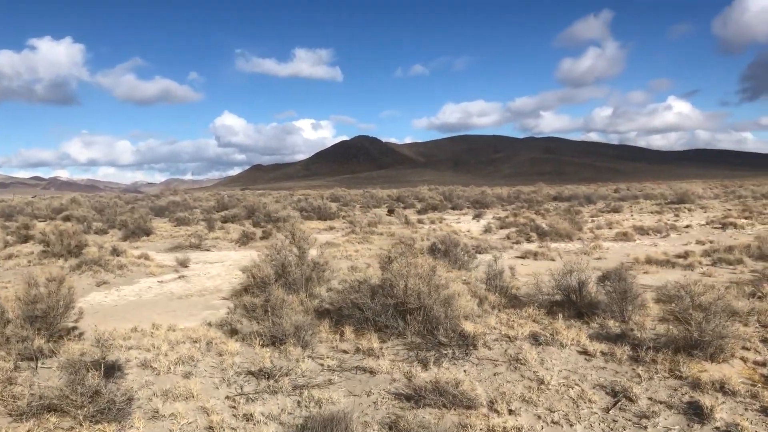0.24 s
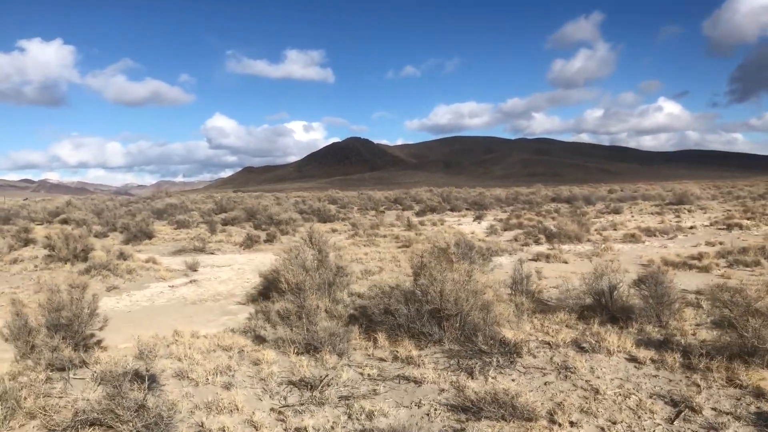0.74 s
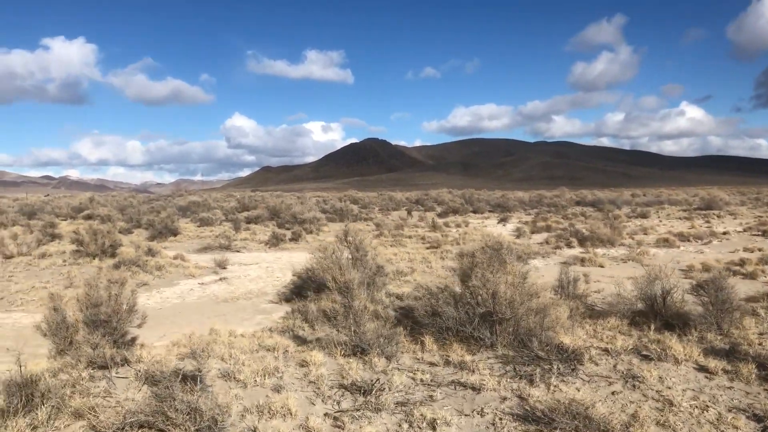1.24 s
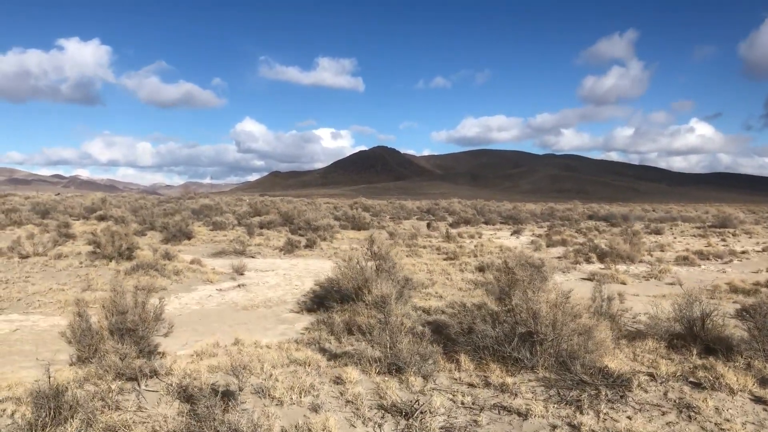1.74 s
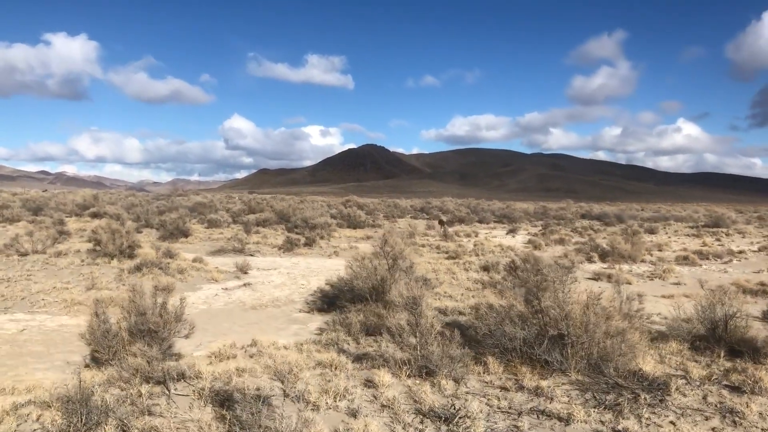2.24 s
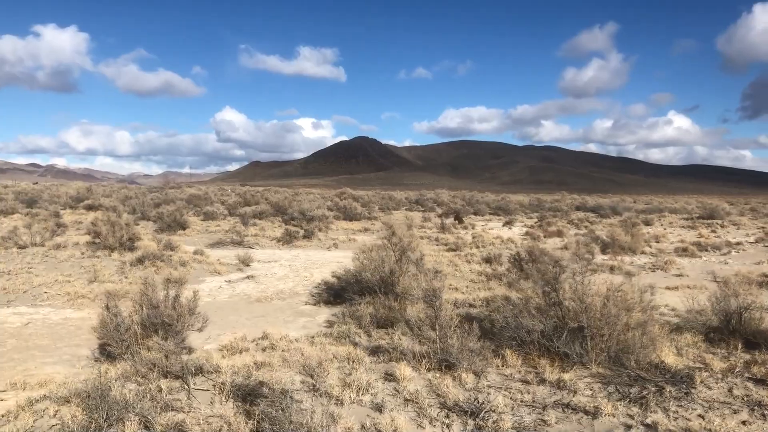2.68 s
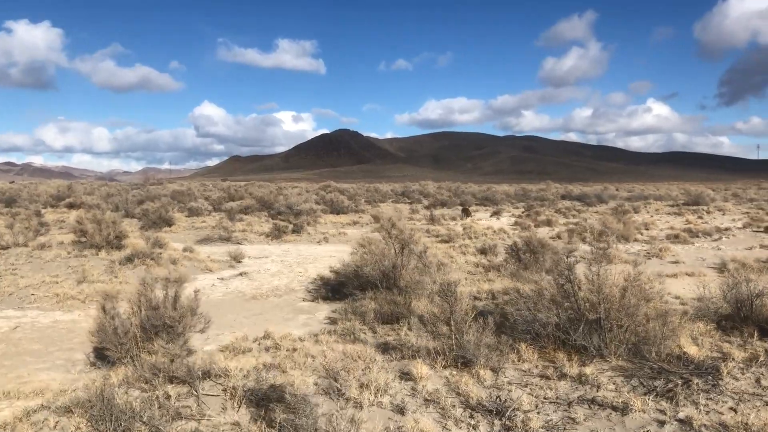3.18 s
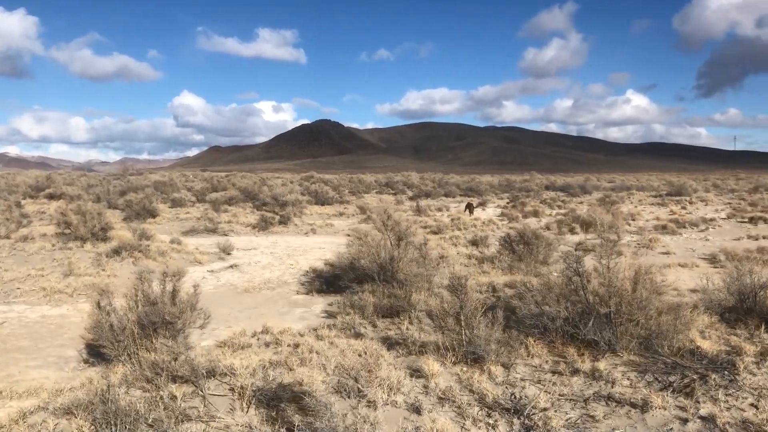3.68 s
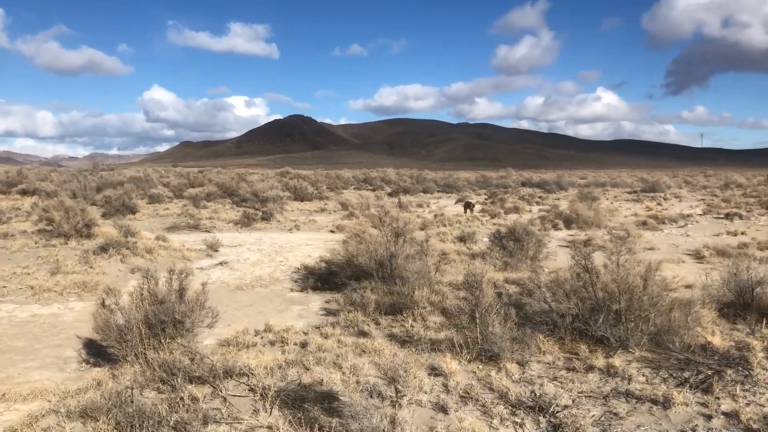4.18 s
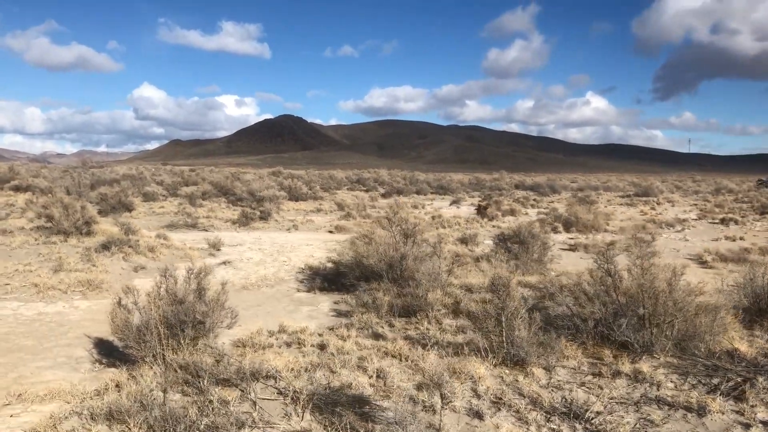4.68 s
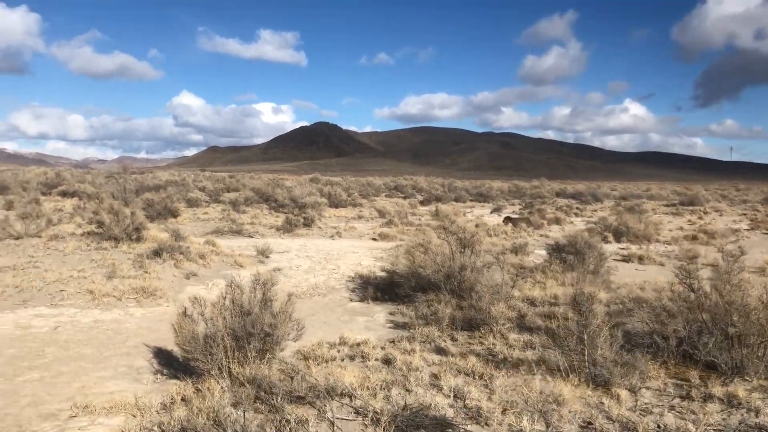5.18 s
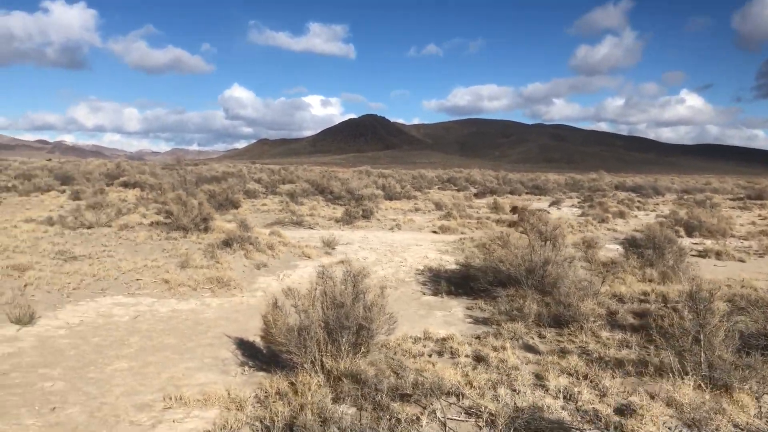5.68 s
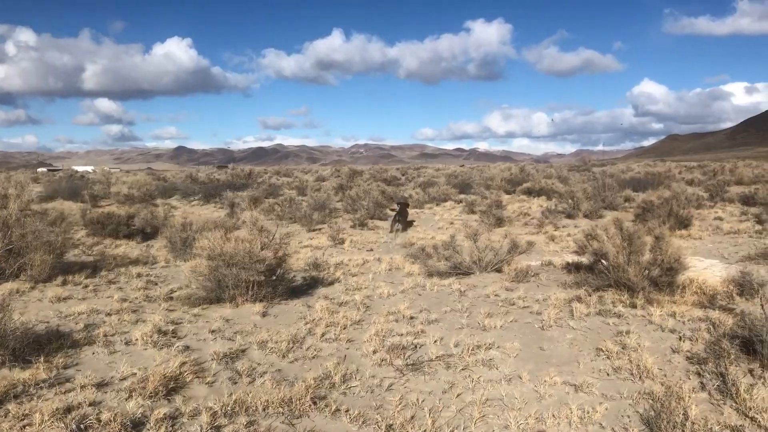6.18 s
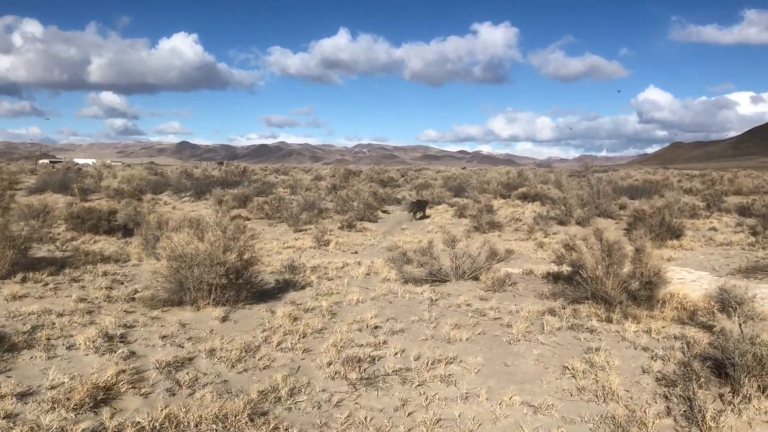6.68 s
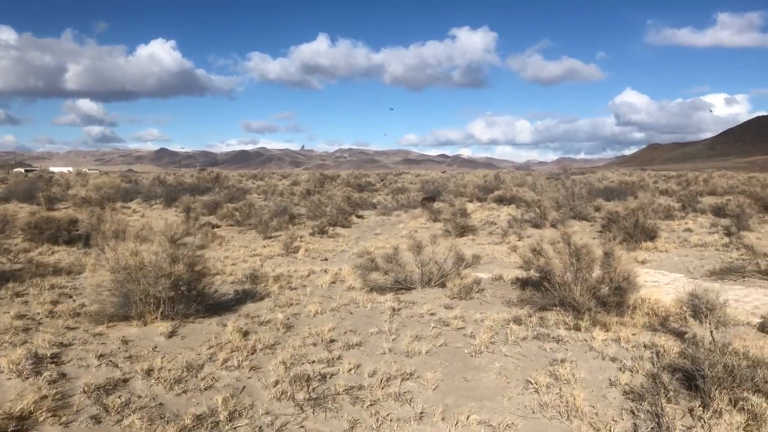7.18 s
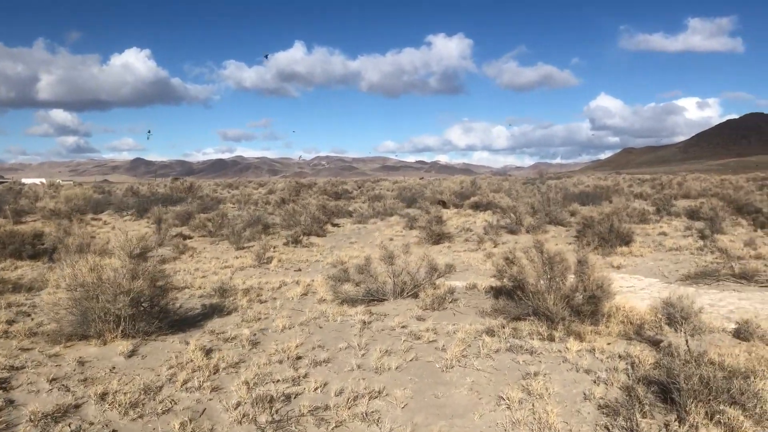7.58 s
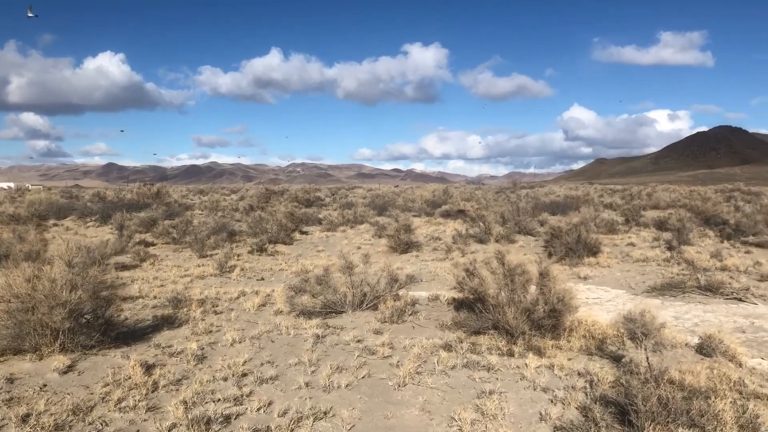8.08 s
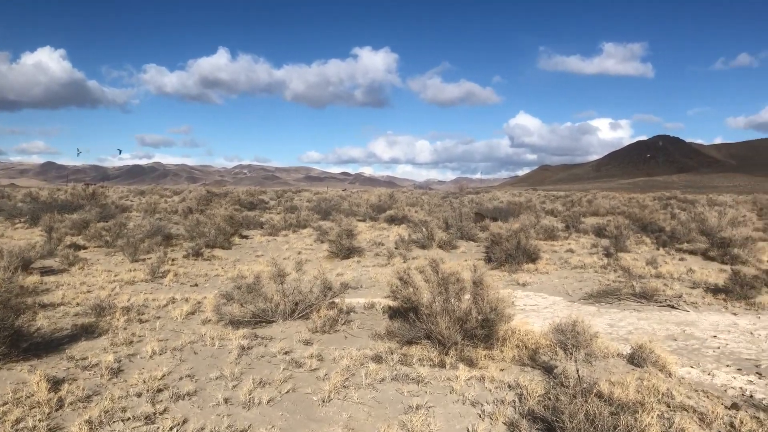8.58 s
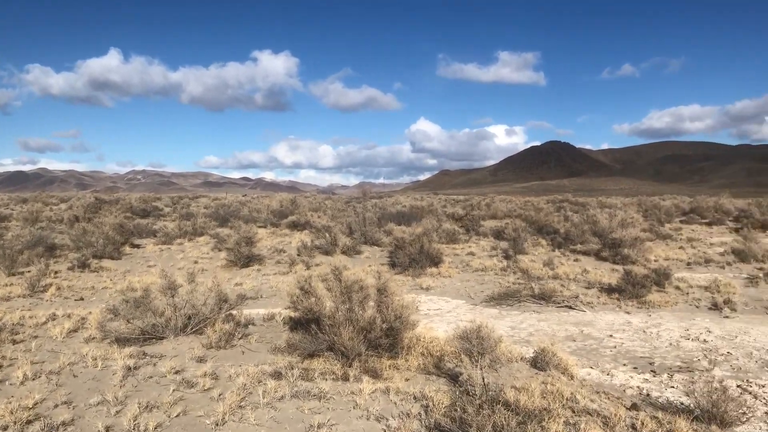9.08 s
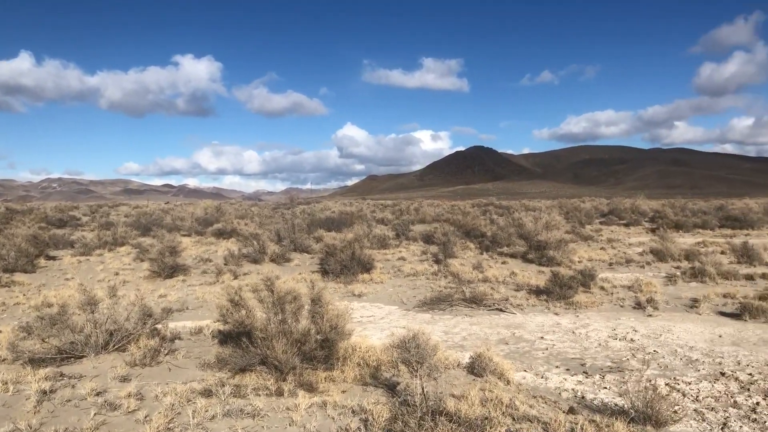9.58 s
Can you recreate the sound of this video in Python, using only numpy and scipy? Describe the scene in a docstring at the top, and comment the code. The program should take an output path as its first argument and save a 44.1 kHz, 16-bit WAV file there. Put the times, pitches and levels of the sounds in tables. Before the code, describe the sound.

On an open scrubby desert flat, gusty wind batters a hand-held phone microphone with low rumble, flutter and blunt thuds, easing around three seconds and surging near five. A click and hard cut drop it to a much quieter stretch: dry brush rustling and snapping, faint sandy scuffs and small knocks of soles, soft low wind thumps, and thin high chirps from a small bird some way off.

```python
"""Gusty wind buffets the microphone port of a hand-held phone, then, after a hard cut, a calmer stretch.
Wind is filtered rumble plus random pressure ripples, with single eddies in the gusts and thumps in the calm.
Dry brush rustles as grainy shaped noise; its snaps and a click at the cut are short noise bursts.
In the calm, noise scuffs and knocks are soles on the ground, and a small bird some way off sings in
gliding sines, over a faint bed of air noise. Table levels are relative: fixed trims follow."""
import sys
import numpy as np
from scipy import signal
from scipy.fft import rfft, irfft
from scipy.io import wavfile
from scipy.ndimage import uniform_filter1d

SR = 44100
rng = np.random.default_rng(int(sys.argv[2]) if len(sys.argv) > 2 else 0)


def inscribe(sig):
    """Save sig as 16-bit PCM at rate SR to the path in sys.argv[1].

    A 1-D sig is mono; a 2-D sig holds one channel per row.
    Samples are clipped to [-1, 1] before scaling.
    """
    pcm = np.round(np.clip(np.atleast_2d(sig).T, -1, 1) * 32767)
    wavfile.write(sys.argv[1], SR, pcm.astype(np.int16))


N = 433944
T = np.arange(N) / SR
CUT_S = 5.8765
GUSTY = T < CUT_S


def wind():
    """Turbulence at the port: rumble and flutter throughout, eddies in the gusts, thumps in the calm."""
    rumble_db, flutter_db, deep_db = wind_levels()
    puff = np.clip(.95 * walk(90) + .35 * walk(25), -3, 1.6)
    gust_flutter = flutter(np.where(GUSTY, flutter_db, -60) + 36, puff)
    calm_flutter = flutter(np.where(GUSTY, -60, flutter_db) + 33, puff)
    blow = undb(rumble_db - 1.32) * rumble(deep_db, puff)
    blow += undb(flutter_db - 5) * np.where(GUSTY, gust_flutter, calm_flutter)
    cut_fade = np.clip(np.abs(T - CUT_S) / 0.00014, 0, 1)
    return cut_fade * (blow + GUSTY * eddies()) + thumps()


# Wind between buffets, before and after the cut. Each row: time in seconds, rumble level in dB,
# flutter level in dB, deepest rumble over whole rumble in dB.
GUST_LEVELS = [(0.0, -33.5, -42.5, -4.5), (0.23, -32.5, -41, -4.5), (0.73, -30.5, -46.5, -4),
               (0.98, -37, -49.5, -3), (1.16, -26, -38, -3.5), (1.34, -25, -37, -4), (1.55, -29, -43, -4),
               (1.73, -32, -47, -4), (1.98, -30.5, -42, -4.5), (2.32, -31.5, -41.5, -4),
               (2.74, -40, -60, -5.5), (2.94, -40, -60, -4), (3.14, -37.5, -58, -6.5),
               (3.3, -41.5, -75, -4), (3.55, -40.5, -58.5, -3), (3.73, -33.5, -49.5, -4),
               (4.27, -30, -49.5, -3), (4.56, -35, -64, -3.5), (4.72, -35, -60.5, -4.5),
               (5.0, -31, -36, -4.5), (5.21, -22.5, -33.5, -3.5), (5.52, -27, -38, -4),
               (5.72, -26.5, -30.5, -3.5), (5.87, -43.5, -61, -5)]
CALM_LEVELS = [(5.9, -52, -69, -5), (6.09, -54.5, -63, -3.5), (6.32, -50.5, -67, -4), (6.52, -58, -78, -3),
               (6.97, -57, -74, -2), (7.38, -56.5, -69, -3.5), (7.61, -55, -75, -2.5), (7.76, -56, -77, -3),
               (8.34, -54.5, -75, -2.5), (8.43, -55, -85, -2), (8.58, -68, -87, -1), (8.8, -59, -76, -5),
               (9.0, -57, -75, -4), (9.18, -54.5, -82, -3), (9.42, -56, -80, -4.5), (9.67, -58, -66, -5),
               (9.84, -56, -64, -3)]
# Short swells of the wind. Each row: start in seconds, peak level in dB, flutter over rumble in dB,
# decay time in seconds.
BUFFETS = [(0.137, -22, -6, 0.079), (0.241, -17, -9.5, 0.05), (0.307, -21.5, -23, 0.05),
           (0.416, -15.5, -24, 0.032), (0.634, -18, -15, 0.046), (0.691, -17, -15, 0.036),
           (0.777, -22, -11, 0.029), (0.92, -16, -9.5, 0.046), (1.011, -15.5, -21, 0.067),
           (1.07, -12.5, -6.5, 0.046), (1.161, -12, -17, 0.037), (1.233, -19.5, -10.5, 0.03),
           (1.35, -19, -8.5, 0.075), (1.499, -23, -6.5, 0.033), (1.637, -18.5, -10.5, 0.038),
           (1.703, -28, -12, 0.061), (1.767, -22, -7.5, 0.071), (1.964, -19.5, -13, 0.07),
           (2.14, -22, -15, 0.036), (2.25, -28, -19, 0.05), (2.315, -18, -11.5, 0.13),
           (2.492, -23.5, -12.5, 0.056), (2.653, -23.5, -9.5, 0.035), (2.844, -33, -32, 0.044),
           (2.911, -27.5, -17, 0.072), (3.029, -21.5, -12.5, 0.032), (3.158, -21.5, -16.5, 0.094),
           (3.345, -24.5, -27, 0.017), (3.568, -26, -27, 0.067), (3.822, -24.5, -21.5, 0.027),
           (3.895, -24, -19, 0.024), (3.95, -27.5, -27, 0.05), (4.034, -15.5, -14, 0.1),
           (4.112, -19.5, -10.5, 0.058), (4.19, -23, -7, 0.051), (4.323, -30, -19, 0.05),
           (4.432, -14, -12.5, 0.027), (4.524, -22.5, -26, 0.03), (4.577, -22.5, -8, 0.022),
           (4.684, -26.5, -15, 0.064), (4.77, -19, -10, 0.05), (4.85, -24, -13, 0.04),
           (5.006, -10, -14.5, 0.094), (5.129, -22, -10, 0.045), (5.243, -21, -17, 0.05),
           (5.347, -13, -10, 0.05), (5.458, -15.5, -9, 0.05), (5.535, -20, -13.5, 0.076),
           (5.706, -21.5, -5, 0.091), (5.817, -18, -9, 0.078), (6.06, -43, -15, 0.05),
           (6.21, -41.5, -1, 0.043), (6.342, -34, -17, 0.051), (6.446, -42.5, -23, 0.05),
           (6.71, -45, -22, 0.039), (7.029, -54, -25, 0.05), (7.104, -51, -19, 0.062),
           (7.352, -36, -13.5, 0.075), (7.705, -42, -26, 0.057), (8.079, -44, -18, 0.031),
           (8.19, -60, -19, 0.05), (8.398, -40.5, -24, 0.05), (8.48, -44, -22, 0.036),
           (8.567, -46, -31, 0.043), (8.61, -49, -26, 0.038), (8.748, -45, -23, 0.054),
           (8.811, -44, -16, 0.046), (8.973, -42, -8.5, 0.04), (9.154, -42.5, -19, 0.06),
           (9.353, -42.5, -18, 0.059), (9.472, -37, -16, 0.05), (9.508, -40, -8, 0.042),
           (9.566, -38, -17, 0.043), (9.653, -34, -21, 0.024), (9.689, -38.5, -7, 0.027),
           (9.741, -37.5, -12, 0.05)]
BUFFET_ATTACK_S, BUFFET_RMS_DB = .012, -6.5  # rms under the peak
RUMBLE_WAVER_DB, FLUTTER_WAVER_DB, DEEP_WANDER_DB = 0.84, 2.0, 2.0


def wind_levels():
    """Rumble, flutter and deep-share levels in dB: a wavering steady wind plus the power of the buffets."""
    def steady(column):
        gust_db = np.interp(T, *np.array(GUST_LEVELS).T[[0, column]])
        calm_db = np.interp(T, *np.array(CALM_LEVELS).T[[0, column]])
        return np.where(GUSTY, gust_db, calm_db)

    def buffets(share):
        def swell(rows):
            return swells([(s, db + share * over_db + BUFFET_RMS_DB, BUFFET_ATTACK_S, decay_s)
                           for s, db, over_db, decay_s in rows])
        early = [row for row in BUFFETS if row[0] < CUT_S]
        return np.where(GUSTY, swell(early), swell(BUFFETS[len(early):]))

    rumble_db = in_db(undb(steady(1) + RUMBLE_WAVER_DB * walk(14)), buffets(0))
    flutter_db = in_db(undb(steady(2) + FLUTTER_WAVER_DB * walk(18)), buffets(0.94))
    deep_db = np.minimum(steady(3) + DEEP_WANDER_DB * walk(9), 0)
    return rumble_db, flutter_db, deep_db


# Rumble spectrum. Each row: frequency in Hz, density in dB per Hz.
RUMBLE_SPECTRUM = [(12, -48.5), (20, -19), (47, 0), (81, 2.5), (203, -3.5), (252, -5), (500, -20.5),
                   (650, -43.5), (1100, -120)]


def rumble(deep_db, puff):
    """Low noise split near 115 Hz: the deep part wavers slowly, the upper part follows the puffs."""
    noise = coloured(RUMBLE_SPECTRUM)
    low_pass = signal.butter(2, 115, fs=SR, output="sos")
    deep = signal.sosfiltfilt(low_pass, noise)
    upper_share = np.sqrt(np.clip(1 - undb(2 * deep_db), .08, 1))
    upper = unit((noise - deep) * undb(3.2 * puff))
    return undb(0.75 * deep_db) * unit(deep * undb(1.4 * walk(25))) + upper_share * upper


# Random ripples of the flutter, by size. Each row: rate per second, width in ms, frequency in Hz,
# level in dB, extra dB per dB of gust.
RIPPLES = [(257.8, 1.07, 342, 2, 0), (200.2, 0.85, 534, -3, 0.16), (203.4, 0.76, 853, -15, 0.67),
           (120, 0.72, 1240, -25, 1.5), (110, 0.12, 1200, -38, 1.0)]


def flutter(gust_db, puff):
    """A dense rain of random ripples; the finer sizes grow faster with the gust than the coarse ones."""
    out = 0
    t = np.arange(-512, 513) / SR
    for rate, width_ms, hz, db, slope in RIPPLES:
        level = undb(db + slope * gust_db + 5.97 * puff)
        for phase in (0, .25):  # cycles
            struck = rng.random(N) < rate / 2 / SR
            hits = struck * rng.standard_normal(N) * level
            shape = ripple(t, width_ms, hz, phase) * np.hanning(len(t))
            out = out + signal.fftconvolve(hits, shape, "same")
    return out / 2.8 * np.sqrt(SR / 400)


# Single eddies breaking on the port. Each row: time in seconds, level in dB,
# fine over coarse ripple in dB.
EDDIES = [(0.05, -40, -35), (0.068, -24.5, -28), (0.107, -26, -48), (0.135, -26.5, -35),
          (0.232, -23.5, -42), (0.273, -37, -51), (0.294, -38.5, -41), (0.344, -36.5, -44.5),
          (0.366, -36, -45), (0.402, -27, -46), (0.656, -35, -51), (0.775, -21, -33.5), (0.834, -37.5, -40),
          (0.848, -40, -40), (0.926, -25, -51), (0.949, -31, -36.5), (0.964, -25, -46), (1.015, -29.5, -45),
          (1.029, -32, -42), (1.055, -31, -38), (1.078, -20.5, -40), (1.099, -19, -32), (1.11, -18, -24),
          (1.126, -16, -22), (1.16, -20.5, -37), (1.177, -20.5, -38), (1.223, -24.5, -27),
          (1.243, -16.5, -30.5), (1.276, -32, -36), (1.299, -26, -36.5), (1.311, -26, -41),
          (1.351, -23, -48), (1.378, -25.5, -42), (1.44, -26.5, -46), (1.481, -28, -43),
          (1.506, -23.5, -40), (1.527, -16, -35.5), (1.634, -21, -37), (1.649, -31, -42), (1.678, -39, -34),
          (1.715, -24, -35), (1.761, -37, -42), (1.781, -31, -45), (1.803, -30, -36), (1.846, -25, -49),
          (1.918, -44, -49), (1.974, -30, -34.5), (2.005, -27, -43), (2.061, -27, -42), (2.091, -38, -50),
          (2.106, -20, -54), (2.16, -32, -40), (2.176, -29, -41), (2.203, -28, -52), (2.251, -42, -36),
          (2.328, -25.5, -46), (2.367, -18.5, -50), (2.39, -25.5, -28), (2.44, -40, -41), (2.452, -32, -45),
          (2.476, -28.5, -52), (2.51, -34, -56), (2.597, -45, -38), (2.631, -39.5, -52), (2.671, -35, -55),
          (2.92, -50, -34), (3.02, -50, -42), (3.049, -33, -64), (3.102, -51, -27), (3.155, -39.5, -53),
          (3.208, -46, -39), (3.276, -46.5, -36), (3.358, -54, -28), (3.709, -36.5, -48),
          (3.783, -38.5, -49), (3.829, -36, -59), (3.909, -36.5, -43), (3.959, -45.5, -34),
          (4.037, -22, -29.5), (4.088, -23.5, -27.5), (4.116, -30, -34), (4.144, -21.5, -51),
          (4.168, -32.5, -47.5), (4.202, -24, -58), (4.32, -43, -31), (4.354, -45, -36), (4.401, -36, -36),
          (4.434, -32, -25), (4.454, -23.5, -52), (4.535, -38, -47), (4.583, -32, -43), (4.705, -45, -44),
          (4.759, -31.5, -45), (4.785, -34, -36), (4.805, -35, -38), (4.865, -38, -34), (4.876, -41, -39),
          (5.001, -23.5, -45), (5.028, -24.5, -35), (5.056, -18.5, -36), (5.086, -18, -32.5),
          (5.137, -15, -28), (5.166, -19, -21), (5.185, -13.5, -25), (5.24, -35, -34), (5.26, -23, -29.5),
          (5.276, -19.5, -24), (5.309, -24, -33), (5.328, -22.5, -29.5), (5.342, -23.5, -29),
          (5.366, -24, -29), (5.393, -18.5, -39.5), (5.427, -17.5, -27.5), (5.466, -18, -53),
          (5.502, -28, -46), (5.544, -15.5, -45.5), (5.607, -25.5, -38.5), (5.62, -20.5, -41.5),
          (5.663, -25, -43), (5.688, -24, -48), (5.716, -17, -42), (5.811, -32, -51), (5.836, -30, -44),
          (5.871, -18, -37)]
EDDY_SPACING_S = 0.002505  # mean, before random stretch


def eddies():
    """Each eddy is a faint steep front, then three stronger ripples, each softer, wider and lower than the last."""
    lead_s = .008
    out = np.zeros(N)
    t = np.arange(int(.03 * SR)) / SR - lead_s
    for (s, db, fine_db), chance in zip(EDDIES, rng.random((len(EDDIES), 6))):
        width_ms = max(-fine_db / 80, .1)
        eddy = undb(fine_db + 9) * ripple(t - .0012, 0.2, 1900, chance[3])  # steep front
        for k in range(3):
            delay_s = 0.001054 + k * (.5 + chance[k]) * EDDY_SPACING_S
            coarse = ripple(t - delay_s, width_ms * 1.73 ** k, 680 / 1.136 ** k, chance[3 + k])
            eddy = eddy + undb(-3.5 * k) * coarse
        add(out, s - lead_s, undb(db + 0.5) * eddy * signal.windows.tukey(len(t), .5))
    return out


# Slow puffs thumping the port in the calm. Each row: time in seconds, level in dB,
# frequency in Hz, width in ms.
THUMPS = [(6.061, -41.5, 336, 2.6), (6.152, -40, 336, 2.4), (6.211, -36, 204, 3.1), (6.343, -35, 164, 3.4),
          (6.545, -49, 226, 2.3), (7.047, -52, 164, 2.6), (7.219, -47, 245, 2.6), (7.364, -38.5, 156, 2.6),
          (7.394, -39, 159, 2.6), (7.429, -44, 223, 2.3), (7.604, -46, 215, 2.6), (7.704, -46, 280, 2.6),
          (7.932, -47.5, 230, 2.9), (8.082, -41, 202, 3), (8.183, -54, 151, 2.6), (8.231, -46, 151, 2.4),
          (8.295, -46, 210, 3.9), (8.405, -41, 161, 2.6), (8.442, -50, 151, 2.6), (8.496, -36.5, 167, 2.4),
          (8.621, -43, 223, 4.1), (8.754, -46, 175, 2.6), (8.814, -38.5, 207, 2), (8.839, -41, 151, 2.6),
          (8.936, -46, 156, 2.6), (8.999, -36, 199, 2.3), (9.148, -45, 151, 3.1), (9.189, -41.5, 180, 2.9),
          (9.302, -48, 186, 2.6), (9.367, -36.5, 260, 2.7), (9.479, -40.5, 161, 2.6),
          (9.511, -38, 205, 2.6), (9.573, -37.5, 153, 2.6), (9.619, -42, 275, 2.6),
          (9.664, -30.5, 159, 2.6), (9.689, -33, 288, 1.8), (9.709, -36, 221, 2.6),
          (9.744, -35.5, 231, 2.6), (9.768, -35, 315, 2.2)]


def thumps():
    """Each puff is one wide, low pressure ripple."""
    lead_s = .02
    out = np.zeros(N)
    t = np.arange(int(.05 * SR)) / SR - lead_s
    for (s, db, hz, width_ms), phase in zip(THUMPS, rng.random((len(THUMPS), 1))):
        thump = ripple(t, width_ms, hz, phase) * np.hanning(len(t))
        add(out, s - lead_s + 0.0031, undb(db) * thump)
    return out


def ripple(t, width_ms, hz, phase):
    """A smooth pressure wiggle; the narrower it is, the wider its spectrum spreads."""
    return np.cos(2 * np.pi * (hz * t + phase)) / (1 + (1000 * t / width_ms) ** 2)


# Steady brush rustle. Each row: time in seconds, level in dB.
RUSTLE = [(0, -82.5), (2.3, -83.5), (4.8, -82.5), (5.1, -79), (5.7, -81), (5.9, -78), (6.6, -70),
          (7.15, -80), (7.7, -77), (8.1, -75.5), (8.55, -69.5), (8.9, -69.5), (9.2, -79.5), (9.84, -81)]
# Leaf spectrum. Each row: frequency in Hz, density in dB per Hz.
LEAF_SPECTRUM = [(3530, -28.5), (6000, -8.5), (6900, -10), (10700, -2), (12400, -3.5), (14000, -13.5),
                 (15200, -17.5), (16000, -19.5)]
# Brush sweeping past a leg. Each row: time of the peak in seconds, level in dB,
# rise and fall time in seconds.
SWEEPS = [(.52, -74, .03), (1.04, -79, .04), (1.61, -79, .05), (1.88, -82, 0.036), (2.44, -78, .03),
          (2.62, -72.5, 0.083), (2.96, -76, 0.046), (3.23, -69, 0.033), (3.35, -73, .04), (4.36, -78, .03),
          (4.71, -74.5, .03), (5.84, -70, .04), (6.69, -67.5, .06), (6.85, -71, .03), (7.04, -68, .05),
          (7.62, -77, .05), (7.8, -72, .08), (8.4, -72, .06), (9.05, -68, .07), (9.34, -71, .03),
          (9.43, -69, 0.034), (9.51, -74, 0.028), (9.76, -80, .04)]
# Twigs and crust snapping, and at 5.875 s the click at the cut. Each row: start in seconds, level in dB,
# frequency in Hz, dull crack level in dB.
SNAPS_AND_CLICK = [(0.0692, -63, 11000, -68), (0.508, -47, 8400, -78.5), (1.8028, -60.5, 10600, -79),
                   (1.8791, -55, 11300, -79), (2.167, -65, 7460, -74), (2.3406, -65, 7890, -76),
                   (2.42, -58, 11300, -77), (2.4518, -56.5, 7740, -81), (2.9208, -61, 10800, -79),
                   (2.9642, -61, 11300, -80), (3.1088, -50, 10000, -70), (3.2176, -53, 8710, -72),
                   (3.3179, -56, 11300, -79), (3.3598, -55, 9210, -79), (3.397, -56, 9700, -73),
                   (3.4276, -36.5, 10600, -55), (3.5748, -60, 9350, -79), (3.6544, -56, 10500, -81),
                   (3.9843, -62, 7130, -71), (4.3587, -53.5, 8990, -79), (4.5161, -64, 9990, -76),
                   (4.583, -64, 7500, -81), (4.8095, -57, 7950, -78), (4.8648, -63, 8930, -63),
                   (4.9082, -52, 8490, -78), (4.9312, -54, 11800, -79), (4.9741, -48, 10600, -79),
                   (5.0165, -51, 10300, -71), (5.0604, -56, 9820, -78), (5.084, -63, 7170, -64),
                   (5.1168, -48.5, 9220, -67), (5.3243, -50, 12200, -68), (5.839, -58, 7100, -63),
                   (5.875, -46, 7190, -45), (6.0397, -60, 10900, -75), (6.2931, -60, 13000, -73),
                   (6.4028, -58, 10420, -64), (6.557, -54, 10800, -71), (6.8443, -50.5, 9490, -72),
                   (6.924, -58, 10300, -56), (7.074, -53, 10300, -65), (7.1028, -63, 9680, -77),
                   (7.1876, -48, 10700, -76), (7.3422, -58, 10100, -77), (7.3692, -54, 7500, -75),
                   (7.4689, -44, 8200, -62), (7.5183, -61.5, 8680, -78), (7.5507, -59, 10500, -80),
                   (7.5822, -56, 11600, -81.5), (7.6226, -52, 11300, -70), (7.673, -59, 10600, -65),
                   (7.7255, -38, 8450, -80), (7.8101, -58, 8670, -80), (7.8395, -47, 8210, -83),
                   (8.3579, -54, 12200, -77), (8.404, -51, 10600, -73), (8.5435, -49, 10500, -76),
                   (8.6293, -46, 12100, -68), (8.7809, -55, 8500, -78), (8.8248, -59, 9800, -64),
                   (9.197, -45, 9200, -72), (9.3292, -52, 8170, -72), (9.5043, -57, 11200, -79),
                   (9.641, -51.5, 10400, -75), (9.7542, -54, 12300, -78)]
SHAKE_DB, SHAKE_RISE_S, SHAKE_FALL_S = -24.5, 0.014, 0.028  # rustle swell around each burst


def brush():
    """Leaf noise over decaying random grains, and snaps and the cut's click, each with a swell of rustle."""
    grains = undb(np.minimum(4.4 * rng.exponential(size=N), 14)) * (rng.random(N) < .003)
    grain_power = signal.lfilter([1], [1, -np.exp(-1 / (0.0018 * SR))], grains ** 2)
    grit = np.sqrt(grain_power + 2)
    steady = undb(np.interp(T, *np.transpose(RUSTLE)) + 0.8 * walk(7))
    shaken = swells([(s - SHAKE_RISE_S, db + SHAKE_DB, SHAKE_RISE_S, SHAKE_FALL_S)
                     for s, db, _, _ in SNAPS_AND_CLICK])
    swept = swells([(s - length_s, db, length_s, length_s) for s, db, length_s in SWEEPS])
    rustle_db = in_db(steady, shaken, swept)
    rustle = coloured(LEAF_SPECTRUM) * grit / np.median(grit)
    out = rustle * undb(rustle_db - 2 + 1.3 * walk(30))
    noises = rng.standard_normal((len(SNAPS_AND_CLICK), 1024))
    for (s, db, hz, crack_db), noise in zip(SNAPS_AND_CLICK, noises):
        tick = undb(db - 5) * burst(noise, 0.001, hz, 2000, 1.9)
        ring = undb(db - 9.5) * burst(noise, 0.004, hz, 450, 2.9)
        crack = undb(crack_db + 1) * burst(noise, 0.00058, 3800, 1500, 7.2)
        add(out, s - .002, tick + ring + crack)
    return out


# Soles scuffing sand. Each row: time in seconds, level in dB.
SCUFF = [(5.89, -96), (5.945, -87), (5.96, -67), (6.06, -66), (6.08, -90), (6.38, -80), (6.45, -75),
         (6.7, -78), (7.3, -82), (7.75, -88), (8.1, -79.5), (8.4, -83), (8.5, -75.5), (8.6, -88),
         (9.0, -90), (9.07, -73), (9.14, -86), (9.84, -95)]
# Soles knocking on crust. Each row: start in seconds, peak level in dB, 60 dB ring time in seconds.
KNOCKS = [(6.188, -42.5, 0.024), (7.074, -51, 0.024), (7.084, -42, 0.011), (7.106, -54, 0.022),
          (7.205, -55, 0.023), (8.097, -49.5, 0.017), (8.862, -52, 0.02), (9.023, -55, 0.023),
          (9.134, -59, 0.02), (9.166, -56, 0.017), (9.624, -59, 0.02), (9.834, -45.5, 0.013)]


def steps():
    """Sand scuffs are noise in a dull band; knocks on hard crust are short decaying mid-band noise."""
    s, db = np.transpose(SCUFF)
    sand_spectrum = [(300, -31), (600, 1), (1200, -1), (1500, -13), (2200, -21), (4000, -48)]  # Hz, dB
    out = (T > CUT_S) * undb(np.interp(T, s, db) + 3.5) * coloured(sand_spectrum)
    t = np.arange(2048) / SR
    band = signal.butter(4, [450, 1450], "band", fs=SR, output="sos")
    for (s, db, ring_s), noise in zip(KNOCKS, rng.standard_normal((len(KNOCKS), 2048))):
        knock = signal.sosfilt(band, noise * np.exp(-np.log(1000) * t / ring_s))
        add(out, s, undb(db) * knock / np.abs(knock).max())
        grit = burst(noise, 0.0009, 2700, 1400, 4)  # under the sole
        add(out, s - .002, undb(db - 11) * grit)
    return out


# Whistled notes, one list of breakpoints per note. Each row: time in seconds, frequency in Hz, level in dB.
WHISTLES = [
    [(6.07, 5100, -71), (6.1, 4900, -74), (6.13, 4600, -76)],
    [(6.19, 4300, -76), (6.21, 4100, -76), (6.235, 3900, -80)],
    [(6.31, 4200, -78), (6.33, 3900, -75), (6.355, 3700, -75)],
    [(8.585, 5600, -69), (8.615, 5400, -58.5), (8.627, 3700, -74), (8.635, 5700, -62.5), (8.65, 5400, -66)],
    [(8.83, 5500, -69), (8.855, 5500, -63), (8.865, 3500, -68.5), (8.875, 5700, -66), (8.89, 5400, -81)],
    [(6.85, 4400, -81), (6.865, 4100, -77), (6.88, 3800, -82)],
    [(9.072, 5600, -71), (9.08, 4500, -68), (9.088, 5600, -73)],
    [(9.34, 6200, -66), (9.355, 4000, -69), (9.362, 4900, -66), (9.372, 3400, -71)],
    [(9.393, 3800, -63), (9.402, 6000, -64), (9.414, 6800, -76), (9.421, 4000, -70), (9.428, 6100, -64),
     (9.44, 5600, -65), (9.46, 5600, -74)],
    [(9.44, 5200, -76), (9.475, 4700, -79), (9.5, 4900, -72)],
    [(9.7, 5300, -78), (9.735, 4900, -82), (9.76, 5300, -81), (9.785, 4900, -76)],
    [(9.822, 5000, -78), (9.838, 5000, -68)],
]
# Buzzy falling notes. Each row: start in seconds, end in seconds, start frequency in Hz,
# end frequency in Hz, level in dB.
BUZZES = [(6.43, 6.464, 5600, 4670, -76), (6.623, 6.674, 6470, 5048, -73.5),
          (6.842, 6.884, 6300, 5160, -75), (8.023, 8.062, 6200, 4620, -68.5),
          (8.247, 8.293, 6400, 4770, -71), (8.899, 8.951, 6100, 4260, -66.5),
          (9.135, 9.17, 6240, 4700, -68), (9.227, 9.28, 6150, 4500, -73)]
WARBLE_RATE_HZ, BUZZ_RATE_HZ = 130, 215


def bird():
    """Gliding warbled sines, and falling notes beaten into a buzz by a fast pitch and level flutter."""
    out = np.zeros(N)
    for note in WHISTLES:
        s, hz, db = np.transpose(note)
        t = np.arange(s[0], s[-1], 1 / SR)
        warble_hz = min(150 * undb(1.2 * (db.max() + 69)), 170)  # louder notes warble more
        pitch_hz = np.interp(t, s, hz) + warble_hz * np.sin(2 * np.pi * WARBLE_RATE_HZ * t)
        level = signal.windows.tukey(len(t), .3) * undb(np.interp(t, s, db) + 1)
        add(out, s[0], level * np.sin(2 * np.pi * np.cumsum(pitch_hz) / SR))
    for start_s, end_s, start_hz, end_hz, db in BUZZES:
        t = np.arange(0, end_s - start_s, 1 / SR)
        beat = 2 * np.pi * BUZZ_RATE_HZ * t
        pitch_hz = np.linspace(start_hz, end_hz, len(t)) + 450 * np.cos(beat)
        shape = np.hanning(len(t)) ** 0.27 * (1 + 0.3 * np.sin(beat))
        add(out, start_s, undb(db + 3.5) * shape * np.sin(2 * np.pi * np.cumsum(pitch_hz) / SR))
    return out


# Air spectrum. Each row: frequency in Hz, density in dB per Hz.
AIR_SPECTRUM = [(290, -30.5), (500, -4.5), (698, -6.5), (1000, -12.5), (1250, -6), (1380, -11),
                (2690, -15.5), (3290, -15.5), (6900, -22), (11300, -23), (15100, -28), (16000, -26)]


def air():
    """Faint, slowly wavering broadband noise."""
    return undb(-74.5 + 1.2 * walk(5.7)) * coloured(AIR_SPECTRUM)


def burst(noise, decay_s, hz, width_hz, steep):
    """A decaying noise burst in one band, peak 1, with 2 ms of room for its rise."""
    t = np.arange(len(noise)) / SR - .002
    f = np.arange(len(noise) // 2 + 1) * SR / len(noise)
    decaying = (t >= 0) * noise * np.exp(-t / decay_s)
    x = irfft(rfft(decaying) / (1 + np.abs((f - hz) / width_hz) ** steep))
    return x / np.abs(x).max()


def swells(rows):
    """Power-summed amplitude of (start s, dB, rise s, fall s) swells: linear rise, exponential fall."""
    power = np.zeros(N)
    t = np.arange(SR // 3) / SR
    for s, db, rise_s, fall_s in rows:
        shape = np.where(t < rise_s, (t / rise_s) ** 2, np.exp(-2 * (t - rise_s) / fall_s))
        add(power, s, undb(2 * db) * shape)
    return np.sqrt(power)


def coloured(points):
    """Noise of rms 1 with the given (Hz, dB) spectrum, interpolated over log frequency."""
    hz, db = np.transpose(points)
    f = np.maximum(np.arange(N // 2 + 1) * SR / N, 1)
    gain = undb(np.interp(np.log(f), np.log(hz), db))
    return unit(irfft(rfft(rng.standard_normal(N)) * gain, N))


def walk(rate_hz):
    """Random levels held 1 / rate_hz seconds and slewed twice; rms 1."""
    k = int(SR / rate_hz)
    held = np.repeat(rng.standard_normal(N // k + 1), k)
    return unit(uniform_filter1d(uniform_filter1d(held, k), k)[:N])


def undb(db):
    """Amplitude of a level in dB."""
    return 10 ** (np.asarray(db) / 20)


def in_db(*parts):
    """Level in dB of amplitudes whose powers add."""
    return 10 * np.log10(sum(p ** 2 for p in parts))


def unit(x):
    """Scale to rms 1."""
    return x / np.sqrt(np.mean(x ** 2))


def add(out, s, sound):
    """Mix a short sound in at s seconds."""
    i = max(int(s * SR), 0)
    out[i:i + len(sound)] += sound[:N - i]


def scene():
    """Sum the layers; the ground returns the song 4 ms later."""
    song = bird()
    song = song + 0.3 * np.roll(song, int(0.004 * SR))
    return (wind() + brush() + steps() + song + air())[None]


def record(dry):
    """The phone drops the lowest bass, rounds the loudest peaks and cuts the top."""
    high_pass = signal.butter(3, 40, "high", fs=SR, output="sos")
    low_pass = signal.ellip(10, .2, 80, 15800, fs=SR, output="sos")
    rounded = np.tanh(2.6 * signal.sosfilt(high_pass, dry)) / 2.52
    return signal.sosfilt(low_pass, rounded)


dry = scene()
out = record(dry)
inscribe(out)
```